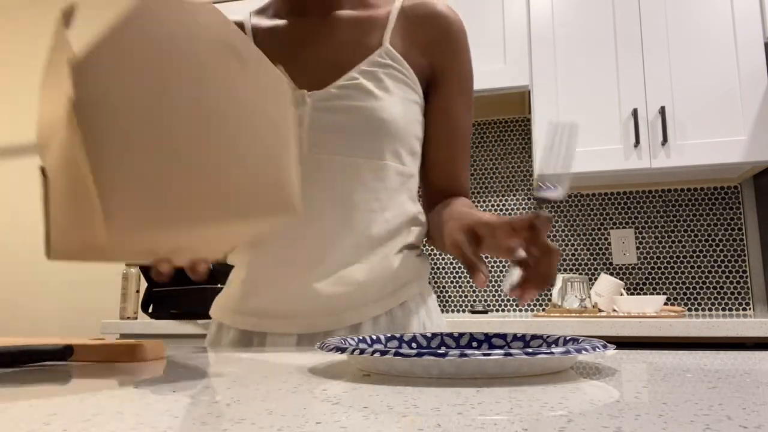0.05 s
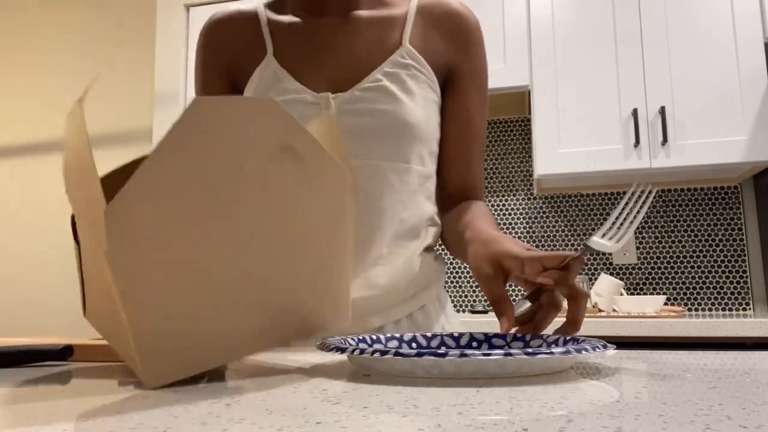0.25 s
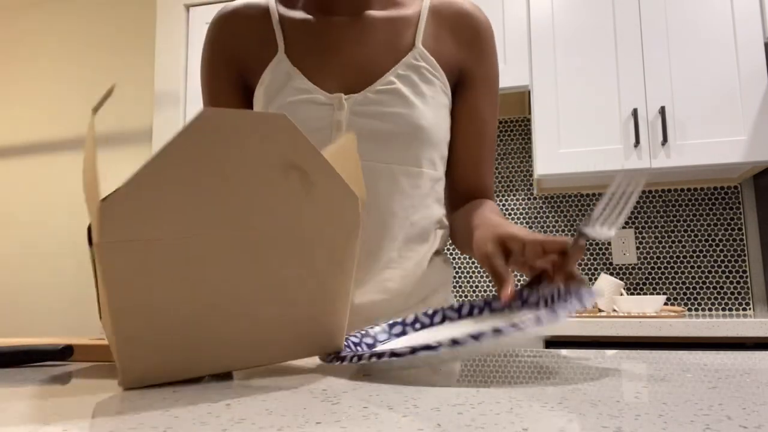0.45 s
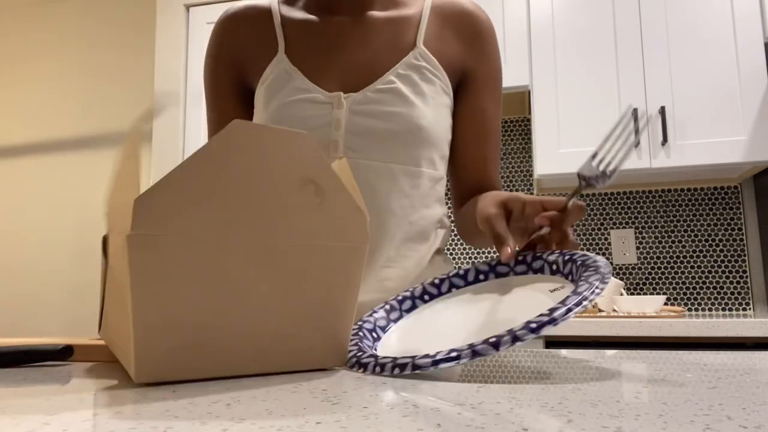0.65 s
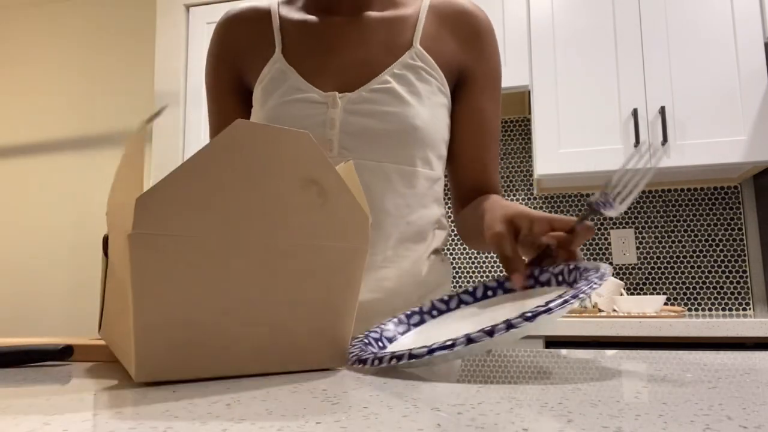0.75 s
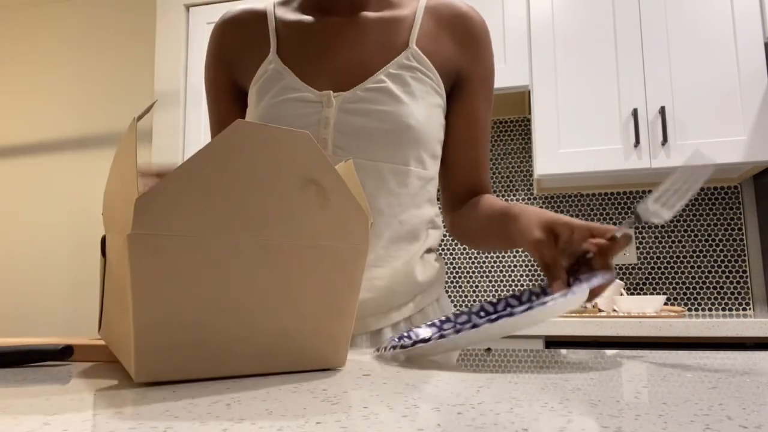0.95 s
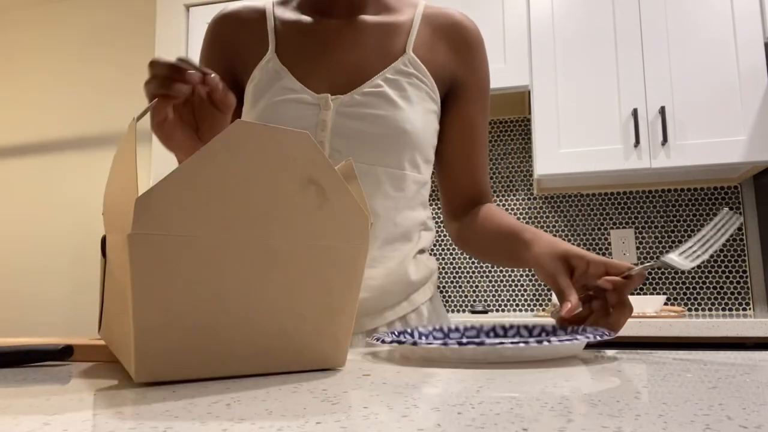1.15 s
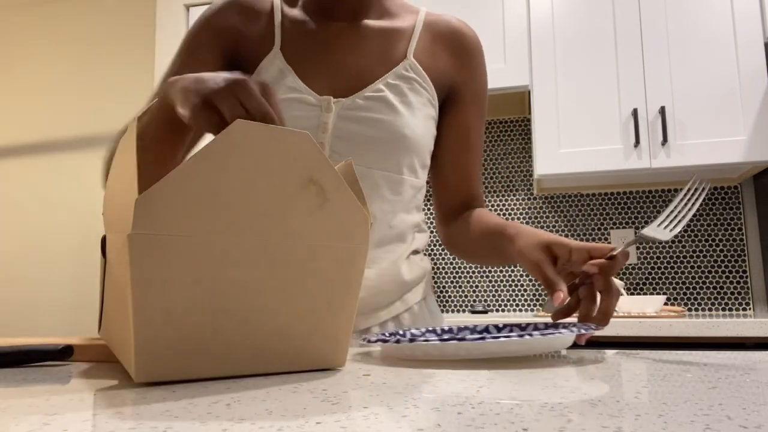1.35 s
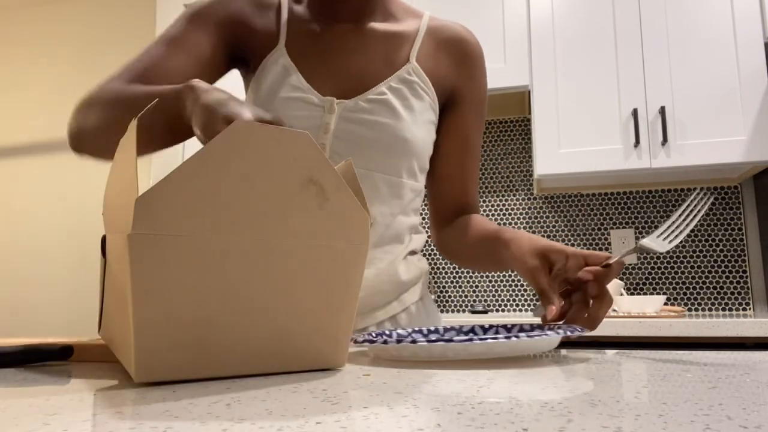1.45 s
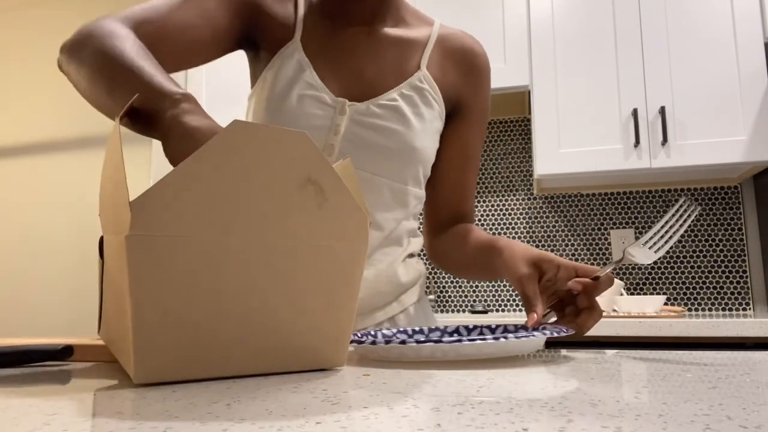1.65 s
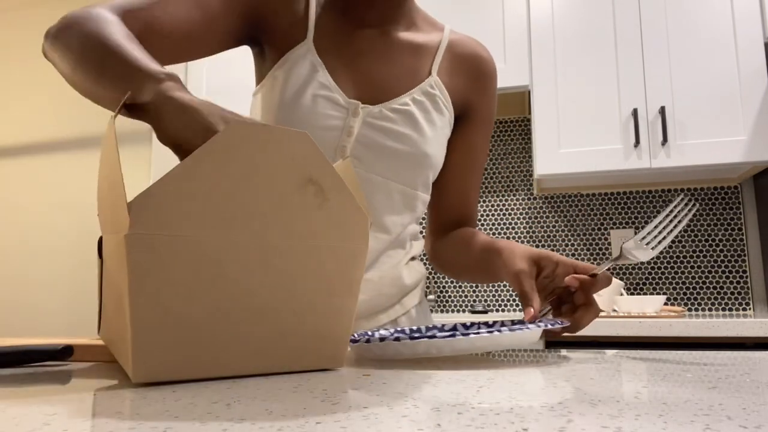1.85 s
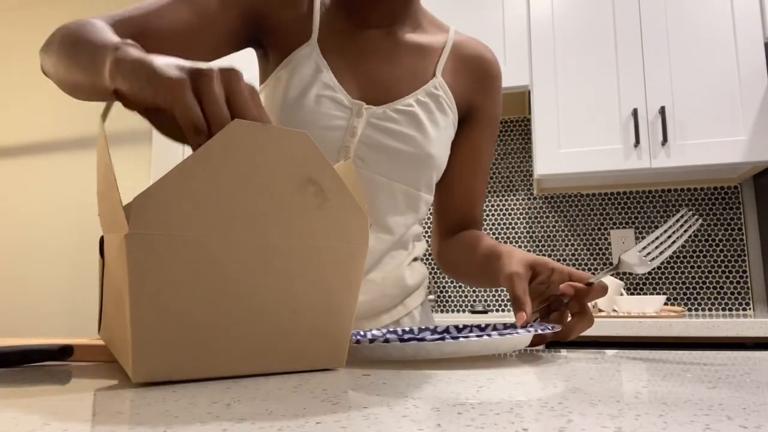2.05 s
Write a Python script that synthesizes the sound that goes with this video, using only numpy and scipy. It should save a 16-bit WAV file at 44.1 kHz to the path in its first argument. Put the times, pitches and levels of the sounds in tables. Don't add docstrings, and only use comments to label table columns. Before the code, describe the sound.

A cardboard takeout box knocks down on a stone counter, rocks flat, then light paper rustles

```python
import sys
import numpy as np
from scipy import signal
from scipy.fft import rfft, irfft
from scipy.io import wavfile
from scipy.ndimage import uniform_filter1d

SR = 44100
rng = np.random.default_rng(int(sys.argv[2]) if len(sys.argv) > 2 else 0)


def dump_mix(stems):
    frames = np.atleast_2d(stems).T
    limited = np.clip(frames, -1, 1)
    pcm = np.round(limited * 32767).astype(np.int16)
    wavfile.write(sys.argv[1], SR, pcm)


def invert_db(x):
    u = np.asarray(x, float) / 20
    return 10 ** u


N = 92610

# frequency in Hz, level in dB, decay time t60 in seconds.
EDGE_MODES = [(246, -10, 0.08), (319.8, -5, 0.033), (362, -6, 0.066), (456, -2, 0.048), (534.8, 0, 0.055),
              (618, 1, 0.045), (711.5, -1, 0.07), (879, -14, 0.3), (914, 2, 0.02), (1042, -4.5, 0.076),
              (1129, -6.5, 0.027), (1704, -14, 0.083), (1984, -15, 0.07)]
# frequency in Hz, level in dB, decay time t60 in seconds.
BASE_MODES = [(178.8, -13.5, 0.054), (311.6, -15.5, 0.052), (604, -18, 0.061), (754, -2.5, 0.024),
              (867, -2, 0.066), (924.4, -6.5, 0.078), (992, -3, 0.048), (1130, -5, 0.078),
              (1280, -3, 0.024), (1626, -7, 0.056), (2030, -30, 0.043), (2590, -11, 0.1),
              (2900, -15, 0.063), (4500, -20, .07)]


def evened(x):
    return x / np.sqrt(np.mean(x ** 2) + 1e-20)


def read(points, hz):
    f, value = np.transpose(points)
    return np.interp(np.log(hz + 1), np.log(f + 1), value)


def add(mix, start_s, sound):
    part = mix[..., round(start_s * SR):][..., :sound.shape[-1]]
    part += sound[..., :part.shape[-1]]


def coloured(x, tilt_db):
    # frequency in Hz, level in dB.
    rasp = [(600, -24), (1300, -3.5), (1900, -2.5), (3000, 0), (4500, 0.5), (6000, -2), (8500, -1),
            (14000, -7.5)]
    low_hz = 700
    hz = np.fft.rfftfreq(len(x), 1 / SR)
    tilt = tilt_db * np.log2((hz + 50) / 3000)
    gain = invert_db(read(rasp, hz) + tilt) / (1 + (low_hz / (hz + 1)) ** 4)
    return evened(irfft(rfft(x) * gain, len(x)))


def ring(modes, contact_hz, spread_db, cycles, ring_db):
    detune = 0.012
    t = np.arange(SR // 4)[:, None] / SR
    hz, db, t60 = np.transpose(modes)
    spot = rng.standard_normal((4, len(hz)))
    u = t * hz / cycles
    swell = u * np.exp(1 - u)
    after = invert_db(ring_db - 60 * t / t60) * (1 - np.exp(-u))
    size = (swell + after) * invert_db(db) / (1 + (hz / contact_hz) ** 2)
    waves = size * np.sin(2 * np.pi * hz * (1 + detune * spot[0]) * t)
    out = invert_db(spread_db * (spot[1] + 2.15 * spot[2:])) @ waves.T
    return out / abs(out).max()


def hum():
    # frequency in Hz, level in dB per Hz.
    hum_colour = [(25, -8.5), (50, -3), (300, -1), (450, -6.5), (1250, -15), (1600, -36.5), (3000, -41),
                  (15000, -52.5)]
    # frequency in Hz, width in Hz, height in dB.
    hum_humps = [(61.3, 25, 8.5), (102, 17, -22), (173, 13, 4), (258, 13, 5), (314, 29, 2.5)]
    # frequency in Hz, correlation from -1 to 1.
    hum_same = [(60, 0.65), (160, 0.78), (300, 0.09), (1000, 0.05)]
    # frequency in Hz, difference in dB.
    hum_pan = [(60, -2.5), (250, -5.5), (1000, -3.5), (4000, -0.5)]
    level_db, patch_db = -46, 2.1
    hz = np.fft.rfftfreq(2048, 1 / SR)
    a, b, c, d, patches = rng.standard_normal((N // 512 + 5, 1025, 5)).T
    patches = evened(uniform_filter1d(uniform_filter1d(patches, 10, 0), 5, 1))
    same = np.clip(read(hum_same, hz), -1, 1)[:, None]
    left = a + 1j * b
    right = same * left + np.sqrt(1 - same ** 2) * (c + 1j * d)
    right = right * invert_db(-read(hum_pan, hz))[:, None]
    humps = sum(db * np.exp(-((hz - f) / w) ** 2) for f, w, db in hum_humps)
    z = np.array([left, right]) * invert_db((read(hum_colour, hz) + humps)[:, None] + patch_db * patches)
    return invert_db(level_db) * evened(signal.istft(z, nperseg=2048, noverlap=1536)[1][:, :N])


def kitchen(x):
    # frequency in Hz, decay time t60 in seconds.
    decay = [(100, 0.27), (500, 0.14), (2000, 0.45), (10000, 0.19)]
    taps = np.zeros((2, SR // 2))
    at = np.arange(200, SR // 2 - 20, 20) + rng.integers(0, 20, (2, (SR // 2 - 201) // 20))
    np.put_along_axis(taps, at, rng.choice([-1., 1.], at.shape), 1)
    hz, t, z = signal.stft(taps, SR, nperseg=256)
    tail = signal.istft(z * invert_db(-60 * t / read(decay, hz)[:, None]), SR, nperseg=256)[1]
    return signal.fftconvolve(x[None], tail / np.linalg.norm(tail[0]), axes=1)[:, :N]


def strokes():
    # start in seconds, length in seconds, level in dB, tilt in dB per octave, box ring in dB.
    slides = [
        (0.246, 0.17, -68.5, 2, -41),
        (0.308, 0.13, -48.5, -3, -46),
        (.545, 0.057, -44, -6.5, -38),
        (0.597, 0.1, -46.5, -6.5, -35.5),
        (0.676, 0.18, -60.5, -7.5, -42.5),
        (0.791, 0.1, -44.5, 4.5, -50),
        (0.952, 0.15, -49.5, 2, -56),
        (1.047, 0.041, -53.5, -6.5, -54),
        (1.369, 0.17, -62, -0.5, -58),
        (1.486, 0.069, -61, 1, -54),
    ]
    # start in seconds, length in seconds, level in dB, tilt in dB per octave, box ring in dB.
    rustles = [
        (.38, 0.22, -56, 6.5, -52),
        (.46, 0.26, -49, -6.5, -43),
        (1.07, 0.14, -55.5, -1, -61),
        (1.28, .06, -63.5, -3.5, -56),
        (1.52, 0.25, -59.5, -2, -56),
        (1.70, 0.3, -63, -4.5, -55),
        (1.90, 0.2, -59, -2.5, -48.5),
        (2.02, 0.13, -55, -5.5, -47.5),
    ]
    grains_per_s, grain_db, clump_db = 5400, 0.5, 3.5
    rise_s, hold, fade_db = 0.0029, 0.3, -11
    out = np.zeros((2, N))
    box = ring(BASE_MODES + EDGE_MODES[:7], 900, 2.05, 1.04, 0)[:, :4000]
    t = np.arange(SR // 3) / SR
    for rows, swell in ((slides, 0), (rustles, 0.26)):
        for start_s, length_s, db, tilt_db, box_db in rows:
            draw, noise = rng.random((2, len(t))), rng.standard_normal((3, len(t)))
            clump = invert_db(clump_db * evened(uniform_filter1d(noise[1], 300)))
            caught = draw[1] < grains_per_s / SR
            fibres = evened(noise[0] * invert_db(-grain_db * np.log(draw[0] + 1e-3)) * caught)
            u = np.maximum(t / length_s - hold, 0) / (1 - hold)
            rise = np.minimum(t / (rise_s + swell * length_s), 1)
            shape = rise * invert_db(fade_db * u ** 1.28) * clump
            other = coloured(0.27 * fibres + 1.8 * noise[2], tilt_db)
            add(out, start_s, shape * invert_db(db) * np.array([coloured(fibres, tilt_db), other]))
            hollow = signal.fftconvolve((shape * fibres)[None], box / np.linalg.norm(box[0]), axes=1)
            add(out, start_s, invert_db(box_db) * hollow)
    return out


def chatter():
    # start in seconds, length in seconds, pitch in Hz, level in dB.
    drags = [
        (0.322, 0.059, 1880, -46.5),
        (0.32, 0.057, 8160, -54.5),
        (0.572, 0.021, 2010, -43.5),
        (0.776, 0.034, 2585, -48.5),
        (1.757, 0.11, 4500, -73),
        (1.945, .035, 2180, -66.5),
        (2.044, 0.033, 3800, -67),
    ]
    out, t = np.zeros(N), np.arange(SR // 8) / SR
    for start_s, length_s, hz, db in drags:
        slips = rng.standard_normal(len(t)) * (rng.random(len(t)) < .03)
        slips = slips * np.sin(np.pi * np.minimum(t / length_s, 1))
        note = np.sin(2 * np.pi * hz * t[:400]) * np.exp(-t[:400] * hz / 3.8)
        add(out, start_s, invert_db(db) * evened(np.convolve(slips, note)) * np.sqrt(length_s / t[-1]))
    return out


def ticks():
    # start in seconds, level in dB, tilt in dB per octave.
    taps = [(0.2449, -33.5, -9.5), (0.3064, -34.5, -7), (.5462, -28, -2.5), (0.6008, -23.5, -5),
            (0.6742, -28.5, -7.5), (0.793, -36, -1), (0.9493, -44, 3), (1.055, -41.5, -1.5),
            (1.1558, -64, -1), (1.167, -41, -5.5), (1.1963, -46, -12), (1.3706, -65, -1), (1.485, -39, -2),
            (1.716, -57.5, -4), (1.84, -54, 4)]
    out, t = np.zeros(N), np.arange(2048) / SR
    crack, puff = np.exp(-t / 0.0018), invert_db(-10) * np.exp(-t / 0.0069)
    shape = (1 - np.exp(-t / 0.00067)) * (crack + puff)
    for start_s, db, tilt_db in taps:
        add(out, start_s, invert_db(db) * shape * coloured(rng.standard_normal(2048), tilt_db))
    return out


def knocks():
    # start in seconds, blow in dB, contact softness as a corner in Hz, thump in dB.
    edge_blows = [(.2440, -5.5, 490, -19.5), (.2585, -45, 585, -42), (.2715, -41.5, 577, -51),
                  (.3075, -21, 1540, -61), (.330, -44, 700, -68), (.346, -21.5, 1510, -41.5),
                  (.355, -33.5, 830, -44), (1.167, -32.5, 517, -40), (1.198, -25, 540, -52),
                  (1.597, -40, 905, -62), (2.055, -32.5, 820, -63), (2.066, -28, 840, -60)]
    # start in seconds, blow in dB, contact softness as a corner in Hz, thump in dB.
    base_blows = [(.5460, -12, 1800, -34), (.553, -52, 1500, -35), (.582, -33, 1200, -23.5),
                  (.5950, -13.5, 940, -36), (.6055, -19, 1060, -61), (.620, -15, 990, -33),
                  (.651, -27.5, 870, -33.5), (.6765, -20, 1160, -33), (.690, -32, 950, -46),
                  (.819, -25, 779, -39), (.828, -48, 800, -51.5), (.847, -31, 800, -45),
                  (.857, -50, 776, -60), (1.055, -37.5, 1590, -60)]
    # frequency in Hz, level in dB, decay time t60 in seconds.
    counter = [(61.8, -3.5, 0.13), (82.8, 1, 0.23), (156.4, -3.5, 0.49), (200, -36.5, .12)]
    thump_lag_s = 0.01162
    card, stone = np.zeros((2, 2, N))
    for rows, modes, cycles in ((edge_blows, EDGE_MODES, 1.16), (base_blows, BASE_MODES, 1.713)):
        for start_s, db, contact_hz, thump_db in rows:
            add(card, start_s, invert_db(db) * ring(modes, contact_hz, 2.66, cycles, ring_db=5))
            add(stone, start_s + thump_lag_s, invert_db(thump_db) * ring(counter, 460, 1.5, 1, ring_db=0))
    return card, stone


def ports(x):
    # frequency in Hz, turn in radians.
    port_turn = [(60, 0.18), (780, 1.22), (1120, 0.2), (1720, 5.76), (2070, 6.8), (3190, 4.06),
                 (5000, 8.94), (7060, 12.45)]
    # frequency in Hz, difference in dB.
    port_pan = [(60, -7.5), (125, 2), (300, -6), (700, -4.5), (1500, -.6), (8000, -1.8)]
    hz = np.fft.rfftfreq(N, 1 / SR)
    half = np.exp(.5j * read(port_turn, hz)) * invert_db(.5 * read(port_pan, hz))
    return irfft(rfft(x) * np.array([half, 1 / half]), N)


def scene():
    card, stone = knocks()
    near = card + ticks() + strokes() + chatter()
    echo_db = -6.5
    return ports(near + stone) + invert_db(echo_db) * kitchen(near[0]) + hum()


def roll_off(x):
    return signal.sosfilt(signal.butter(12, 15690, fs=SR, output="sos"), x)


def record(dry):
    mic_low_hz, join_hz, top_hz = 48, 7000, 15900
    in_step_hz, half_turn_hz = 8000, 2480
    weak, weak_db = .42, -24
    hz = np.fft.rfftfreq(N, 1 / SR)
    z = rfft(dry) / (1 + (mic_low_hz / (hz + 1)) ** 4)
    turn = .5 * np.pi * (hz - in_step_hz) / half_turn_hz
    mid, side = [z[0] * v * np.where(abs(v) < weak, invert_db(weak_db), 1)
                 for v in (np.cos(turn), 1j * np.sin(turn))]
    treble = np.array([mid + side, mid - side]) * (hz < top_hz)
    join = np.clip((hz - join_hz) / 400, 0, 1)
    mix = irfft(z * np.sqrt(1 - join) + treble * np.sqrt(join), N)
    return roll_off(mix)


dry = scene()
out = record(dry)
dump_mix(out)
```